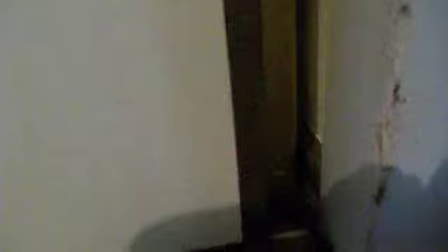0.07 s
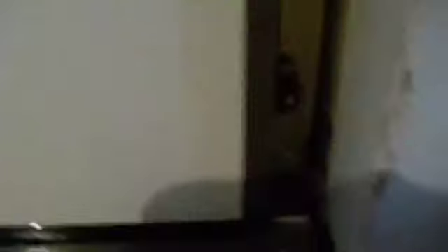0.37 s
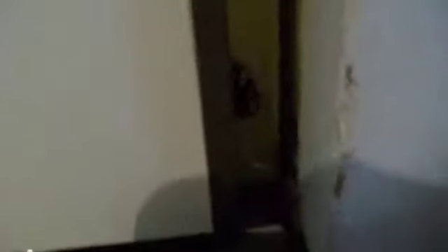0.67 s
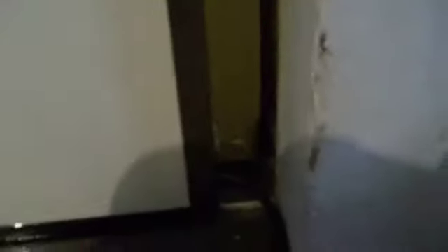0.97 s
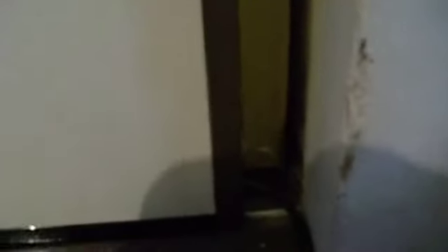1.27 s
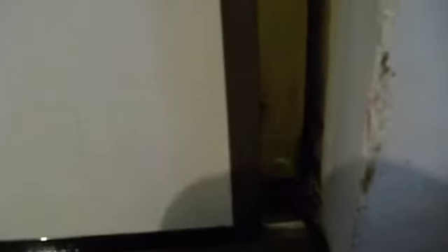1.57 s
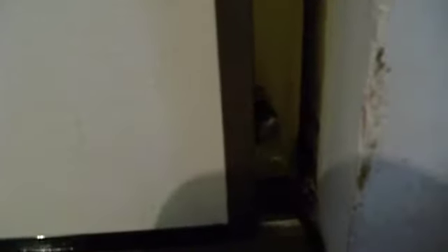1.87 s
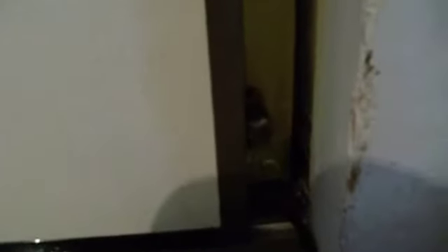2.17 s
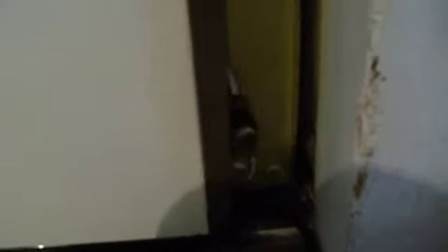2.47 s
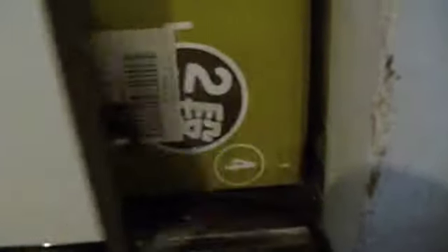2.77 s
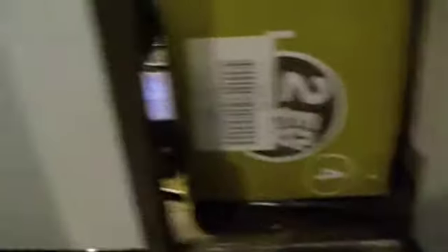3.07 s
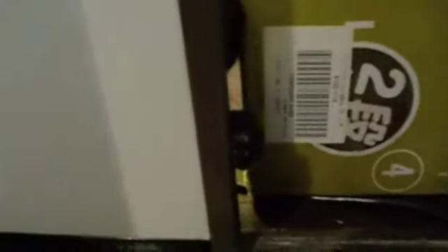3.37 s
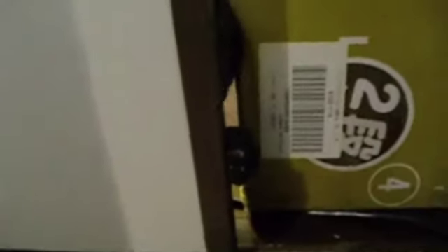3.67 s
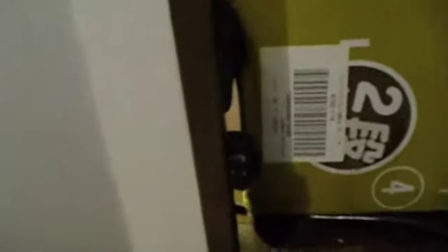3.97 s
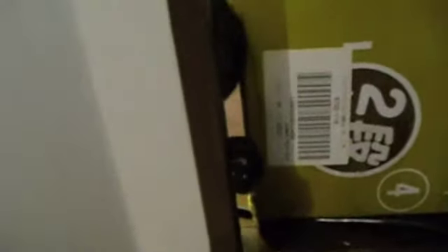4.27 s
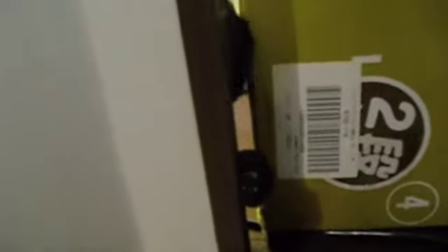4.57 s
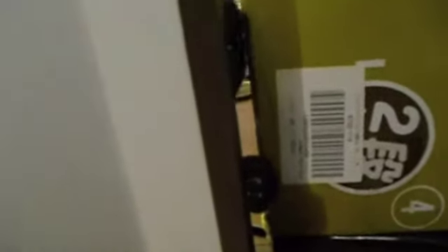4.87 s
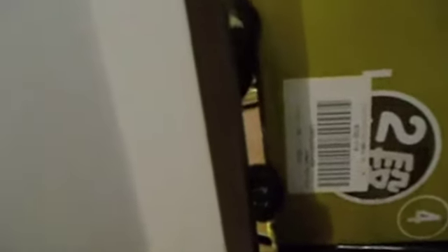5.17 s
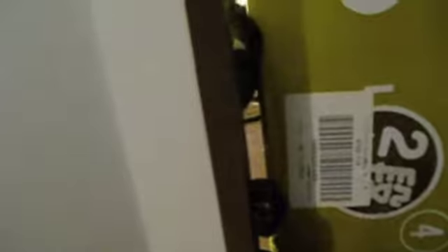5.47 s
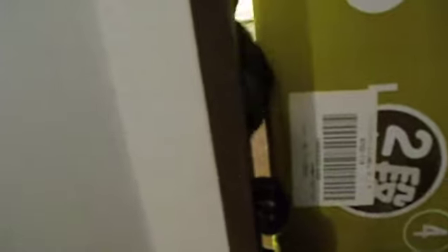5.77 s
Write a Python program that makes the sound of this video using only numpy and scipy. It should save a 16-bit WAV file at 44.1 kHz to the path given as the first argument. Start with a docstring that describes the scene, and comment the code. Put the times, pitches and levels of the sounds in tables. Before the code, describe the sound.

Close to a hand-held microphone in a quiet room, fingers rub and tap the plastic casing, with one click far louder than the rest. Cloth brushes by and a light panel gives two faint knocks before being eased along its track with a soft scraping rustle. It stops with a small clack and knocks lightly three more times. A steady low rumble and hiss run underneath, with no echo.

```python
"""A light sliding panel is eased open in a quiet room, close to a hand-held camera.
First the microphone switches on, and steady room noise and hiss begin. Fingers rub and click on the
camera's plastic shell. The panel knocks faintly in its track, a sleeve brushes by, the camera sways
and the grip shifts. Towards three seconds the panel glides open with a soft rustle and meets its stop.
A few more light knocks follow, and at the end the grip shifts again."""
import sys
import numpy as np
from scipy import signal
from scipy.fft import rfft, irfft
from scipy.io import wavfile
from scipy.ndimage import uniform_filter1d

SR = 44100
rng = np.random.default_rng(int(sys.argv[2]) if len(sys.argv) > 2 else 0)


def master(y):
    """Save y as 16-bit WAV."""
    cut = np.clip(np.atleast_2d(y).T, -1, 1)
    pcm = np.round(cut * 32767)  # scale
    wavfile.write(sys.argv[1], SR, pcm.astype(np.int16))


N = 265482
T = np.arange(N) / SR

# The tone of each noise, from bass to treble. Each row: frequency in Hz, relative level in dB.
ROOM_TONE = [(12, -53), (20, 3), (70, -3.5), (103, -5.5), (175, -7.5), (207, -9), (232, -10.5), (404, -14),
             (505, -16), (2400, -31.5), (12800, -41.5), (15500, -40)]
SKIN_TONE = [(300, -1), (1100, -2.5), (2500, -3), (4800, -7), (6500, -7.5), (8000, -10), (9800, -10.5),
             (11300, -11), (15500, -17)]
SCUFF_TONE = [(200, -1), (850, 4.5), (1800, -5), (2600, -3.5), (3400, -16), (6000, -12), (8000, -9.5),
              (10000, -12), (13500, -11), (15500, -15)]
SLEEVE_TONE = [(200, -3), (700, -10), (1500, -1), (2800, -6.5), (4800, -8), (6500, -5), (9500, -7),
               (12500, -7), (15500, -16)]
GRIP_TONE = [(1000, -12), (5000, -11), (9000, 2), (15500, 0)]
GLIDE_TONE = [(150, 0), (600, -1.5), (1400, -2), (2200, -9), (3000, -7), (4300, -17), (5200, -12),
              (6000, -15), (7200, -12), (9000, -18), (13000, -16), (15500, -18)]
# Fingers rubbing the shell. Each row: loudest moment in seconds, rise and fall time in seconds,
# level in dB, squeak pitch in Hz, squeak level in dB above the rub.
FINGER_RUBS = [(0.241, 0.011, -52, 6700, -12), (0.322, 0.023, -59.5, 12800, -9),
               (0.337, 0.03, -62.5, 3560, 5), (0.454, .027, -55.5, 6160, -11), (0.505, .003, -60, 13000, 0),
               (0.623, .012, -62, 3080, -7), (0.669, .012, -70, 12800, 3), (1.56, .026, -66.5, 12600, 1),
               (1.568, 0.018, -70, 6650, 2)]
# How the plastic shell rings. Each row: pitch in Hz, width in Hz, relative level in dB.
SHELL_RESONANCES = [(680, 400, -13), (2660, 960, -10), (3600, 650, -3), (4830, 440, -16), (6500, 780, -1.5),
                    (8400, 1700, -9), (11340, 900, -9), (12400, 490, -15), (14500, 4200, -19)]
# Fingers tapping the shell. Each row: start in seconds, peak level in dB, treble cutoff in Hz.
FINGER_CLICKS = [(0.2669, -14, 21500), (.2980, -41, 4000), (0.327, -45, 9000), (0.5514, -31, 4570),
                 (.8115, -44, 9000), (1.709, -51, 20000), (2.745, -51, 9000)]
# The panel knocking in its track. Each row: start in seconds, scuff level in dB, scuff treble cutoff
# in Hz, thump gain in dB, thump treble cutoff in Hz, clack level in dB.
PANEL_KNOCKS = [(0.8103, -44, 1400, -55.5, 1490, -64), (1.933, -47.5, 15000, -54, 2000, -62),
                (2.9398, -50, 6000, -58, 600, -54), (3.2063, -58, 3200, -68, 500, -58.5),
                (3.479, -50, 2700, -52, 500, -58.5), (4.2594, -50.5, 12000, -40, 290, -66)]
# How the panel rings. Each row: pitch in Hz, relative level in dB, seconds to fade by 60 dB.
PANEL_NOTES = [(175, 4.5, 0.088), (310, -12, 0.11), (533, -13, .07), (800, 6.5, 0.064), (1320, -6, 0.06)]
# The hand shifting on the camera. Each row: loudest moment in seconds, level in dB.
GRIP_SHIFTS = [(1.35, -72), (1.48, -69), (5.55, -68), (5.81, -71)]
# Tight spots in the track. Each row: time in seconds, boost of the rub in dB, rasp pitch in Hz.
TIGHT_SPOTS = [(2.592, 7.5, 3750), (2.703, 1.5, 5300), (2.78, 1.5, 5100)]


def gain_of(db):
    """Turns decibels into a number to multiply a sound by."""
    return 10 ** (np.asarray(db) / 20)


def evened(x):
    """Scales a sound to an average (rms) level of 1."""
    return x / np.sqrt(np.mean(x ** 2) + 1e-20)


def add(mix, start_s, sound):
    """Mixes a sound in at the given time."""
    part = mix[round(start_s * SR):][:len(sound)]
    part += sound[:len(part)]


def colour(x, tone):
    """Shapes the bass and treble of a sound with a tone table, at average level 1."""
    hz, db = np.transpose(tone)
    f = np.fft.rfftfreq(len(x), 1 / SR)
    curve_db = np.interp(np.log(f + 1), np.log(hz + 1), db)
    return evened(irfft(rfft(x) * gain_of(curve_db), len(x)))


def noise_band(hz, width_hz, size=N):
    """Noise gathered around one pitch by a resonance, at average level 1."""
    f = np.fft.rfftfreq(size, 1 / SR)
    spectrum = rfft(rng.standard_normal(size))
    return evened(irfft(spectrum / (1 + 2j * (f - hz) / width_hz) ** 2, size))


def dull(x, cutoff_hz):
    """Takes the treble off, as a soft contact does."""
    return signal.lfilter(*signal.butter(2, min(cutoff_hz, SR / 2 - 500), fs=SR), x)


def friction(tone, slips_per_s, grain):
    """Rubbing: a smooth hiss of tiny contacts plus larger slips, whose strength is set by grain."""
    slips = rng.standard_normal(N) * (rng.random(N) < slips_per_s / SR)
    return colour(rng.standard_normal(N) + grain * evened(slips), tone)


def swell(peak_s, rise_s, fall_s):
    """A smooth stroke of the hand: rises to 1 and falls again."""
    return np.exp(-0.5 * ((T - peak_s) / np.where(T < peak_s, rise_s, fall_s)) ** 2)


def release(end_s, fade_s):
    """Holds at 1 until end_s, then drops 60 dB every fade_s."""
    return gain_of(-60 * np.maximum(T - end_s, 0) / fade_s)


def room(hum_hz=70, whine_hz=15734):
    """Low room noise running into hiss, a wavering hum and a thin electronic whine."""
    air = gain_of(-49) * colour(rng.standard_normal(N), ROOM_TONE)
    hum = gain_of(-58) * noise_band(hum_hz, width_hz=10.4)
    whine = gain_of(-81) * np.sqrt(2) * np.sin(2 * np.pi * whine_hz * T)
    return air + hum + whine


def finger_rubs():
    """Skin drags over the shell in short swells, each with a soft, hissy squeak of its own."""
    out = np.zeros(N)
    drag = friction(SKIN_TONE, slips_per_s=890, grain=0.79)
    for peak_s, rise_s, db, squeak_hz, squeak_db in FINGER_RUBS:
        squeak = gain_of(squeak_db) * noise_band(squeak_hz, width_hz=0.15 * squeak_hz)
        out += gain_of(db) * swell(peak_s, rise_s, rise_s) * (drag + squeak)
    return out


def shell_ring(size=4096):
    """One sharp blow rings the small plastic shell for a few milliseconds."""
    f = abs(np.fft.fftfreq(size, 1 / SR))
    power = sum(gain_of(db) ** 2 / (1 + (2 * (f - hz) / width_hz) ** 2) ** 2
                for hz, width_hz, db in SHELL_RESONANCES)
    log_gain = 0.5 * np.log(power + 1e-10)
    spectrum = np.exp(np.conj(signal.hilbert(log_gain)))  # puts all the ringing after the blow
    return np.fft.ifft(spectrum).real[:size // 2]


def finger_clicks():
    """Fingers tap the shell; each click has its own loudness and brightness."""
    out, shell = np.zeros(N), shell_ring()
    for start_s, db, cutoff_hz in FINGER_CLICKS:
        click = dull(shell, cutoff_hz)
        add(out, start_s, gain_of(db) * click / abs(click).max())
    return out


def panel_knocks(contact_s=0.00081, scuff_fade_s=0.048, clack_fade_s=0.04):
    """Each knock is a short scuff and clack in the track, with the panel's low ring under them."""
    out, t = np.zeros(N), T[:SR // 4]
    attack = np.minimum(t / contact_s, 1)
    ring = sum(gain_of(db - 60 * t / fade_s) * np.sin(2 * np.pi * hz * t)
               for hz, db, fade_s in PANEL_NOTES)
    for start_s, scuff_db, scuff_hz, thump_db, thump_hz, clack_db in PANEL_KNOCKS:
        noise = colour(rng.standard_normal(len(t)), SCUFF_TONE)
        scuff = gain_of(scuff_db - 60 * t / scuff_fade_s) * evened(dull(noise, scuff_hz))
        rattle = noise_band(hz=2720, width_hz=700, size=len(t))
        clack = gain_of(clack_db - 60 * t / clack_fade_s) * rattle
        thump = gain_of(thump_db) * dull(ring, thump_hz)
        add(out, start_s, attack * (scuff + clack + thump))
    return out


def sleeve_brush(peak_s=0.812):
    """The sleeve touches quickly, dies away and leaves a faint trail of rubbing cloth."""
    touch = gain_of(-58) * swell(peak_s, rise_s=0.012, fall_s=np.inf) * release(peak_s, fade_s=0.32)
    trail = gain_of(-66) * swell(peak_s, rise_s=0.09, fall_s=0.16)
    return (touch + trail) * friction(SLEEVE_TONE, slips_per_s=2200, grain=0.5)


def camera_sway():
    """The camera sways once in the hand, with a short, deep rumble."""
    movement = swell(peak_s=0.89, rise_s=0.045, fall_s=0.05)
    return gain_of(-45) * movement * noise_band(hz=36, width_hz=16)


def grip_shifts():
    """Each small shift of the hand gives a thin, high hiss."""
    shifts = sum(gain_of(db) * swell(peak_s, rise_s=0.035, fall_s=0.087) for peak_s, db in GRIP_SHIFTS)
    return shifts * friction(GRIP_TONE, slips_per_s=900, grain=0.4)


def panel_glide(rub_db=-61, catch_db=2.0, catch_s=0.034):
    """The panel's edge rubs along the track, rasps at tight spots and hisses as it gathers speed."""
    # One push: the panel speeds up, eases off and is halted by its stop.
    speed = swell(peak_s=2.78, rise_s=0.28, fall_s=0.38) * release(end_s=2.95, fade_s=0.11)
    tight_db, rasp = 0, 0
    for peak_s, boost_db, rasp_hz in TIGHT_SPOTS:
        spot = swell(peak_s, rise_s=0.025, fall_s=0.025)
        tight_db += boost_db * spot
        rasp += gain_of(-69) * spot * noise_band(rasp_hz, width_hz=1600)
    # Small random catches make the rub waver in loudness.
    catches = evened(uniform_filter1d(rng.standard_normal(N), round(catch_s * SR)))
    loudness = speed * gain_of(rub_db + tight_db + catch_db * catches)
    rub = loudness * friction(GLIDE_TONE, slips_per_s=510, grain=0.52)
    hiss = gain_of(-68) * speed ** 1.6 * noise_band(hz=10650, width_hz=2200)
    return rub + rasp + hiss


def scene():
    """Adds everything into one channel. It all happens within arm's reach, so there is no echo."""
    mix = room() + finger_clicks() + finger_rubs() + grip_shifts() + sleeve_brush() + camera_sway()
    return (mix + panel_glide() + panel_knocks())[None]


def record(dry, on_s=0.2365, settle_s=0.1, cutoff_hz=15900):
    """The microphone switches on, its voltage swings once and settles; the highest treble is cut."""
    settling = np.maximum(T - on_s, 0) / settle_s
    swing = gain_of(-25) * settling * np.exp(1 - settling)
    live = dry * (T >= on_s) + swing
    treble_cut = signal.firwin(1023, cutoff_hz, window=("kaiser", 9), fs=SR)
    return signal.oaconvolve(live, treble_cut[None], "same")


dry = scene()
out = record(dry)
master(out)
```